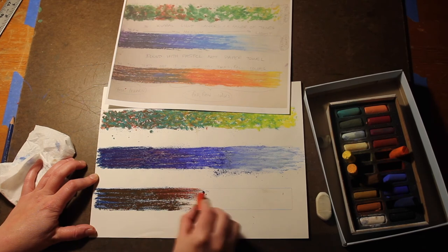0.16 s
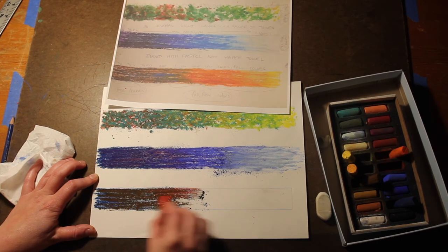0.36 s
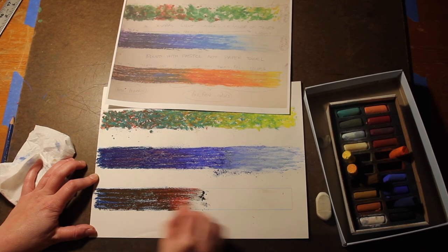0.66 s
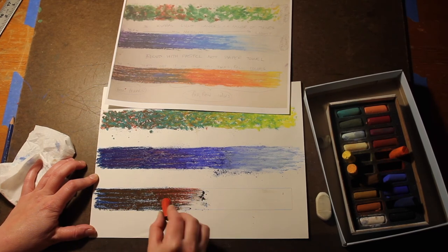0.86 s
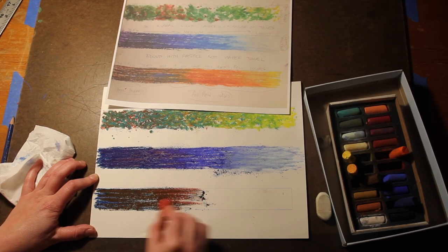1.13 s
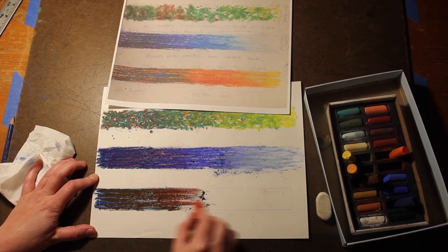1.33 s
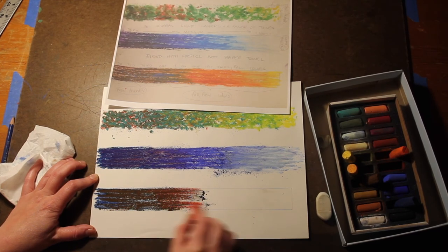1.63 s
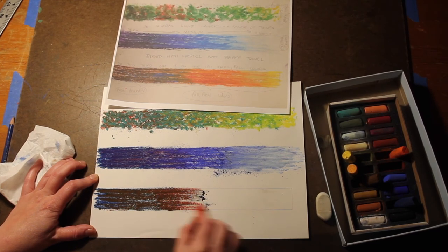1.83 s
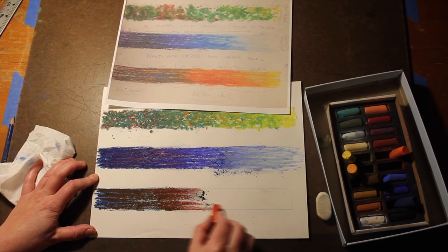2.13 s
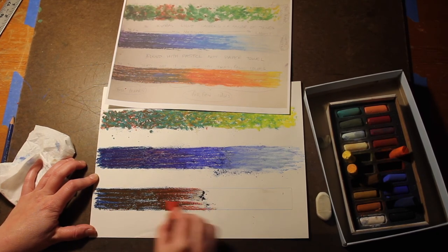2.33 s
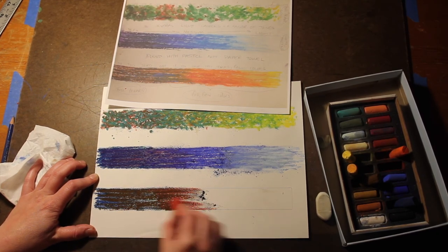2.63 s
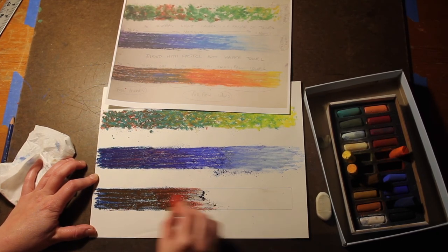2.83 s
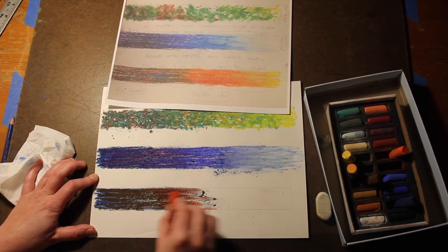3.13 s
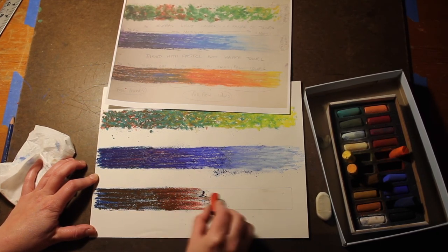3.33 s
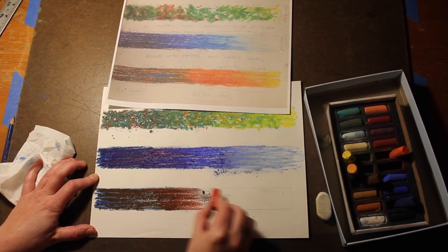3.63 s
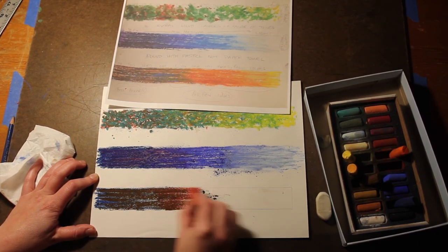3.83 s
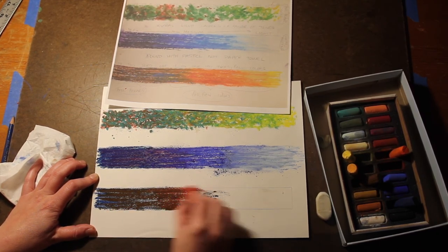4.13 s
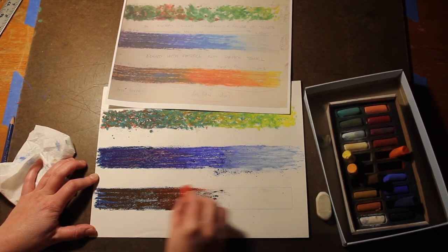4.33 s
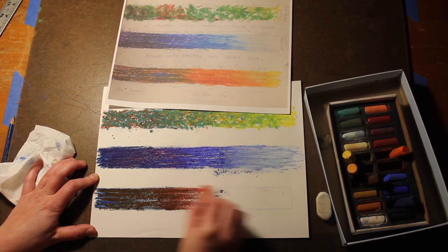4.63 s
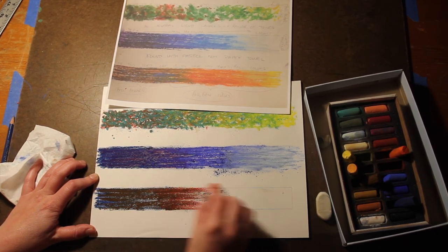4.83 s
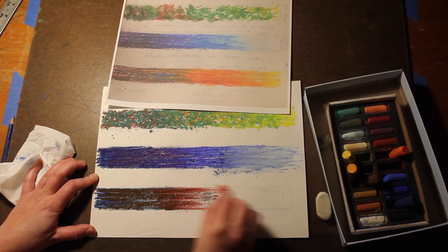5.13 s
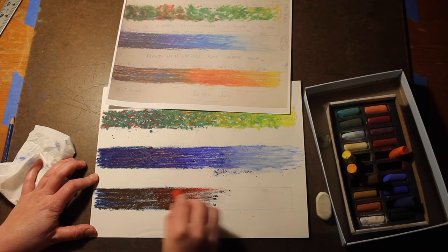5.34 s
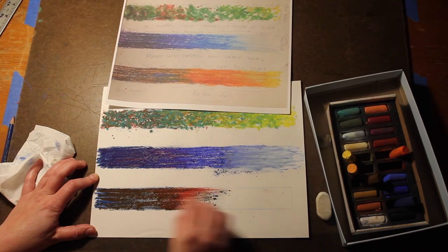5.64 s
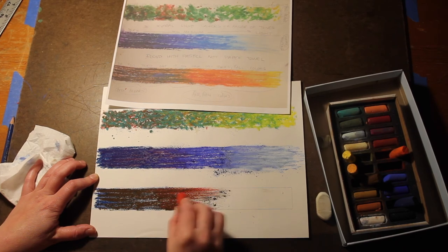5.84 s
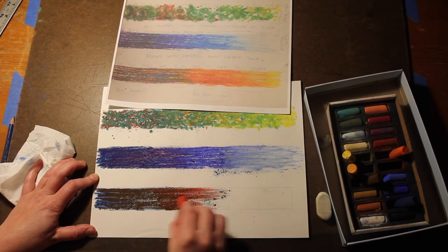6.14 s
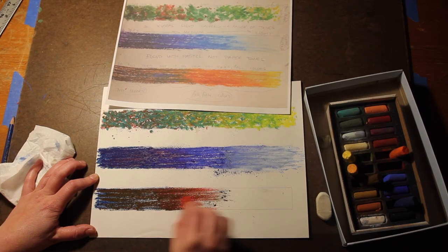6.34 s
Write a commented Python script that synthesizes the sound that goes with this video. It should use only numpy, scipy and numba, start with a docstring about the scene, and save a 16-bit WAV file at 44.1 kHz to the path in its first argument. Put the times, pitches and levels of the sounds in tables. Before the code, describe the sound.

A soft pastel stick scratches across paper in quick, short strokes, with occasional taps and squeaks over a faint hum.

```python
"""A faint, hollow band of noise with a thin hum is there from the start and lies under everything.
A soft pastel stick begins feathering colour onto paper on a desk, about 3.5 strokes a second, and a
small room rings briefly with it. Each stroke lands, chatters as it bites, rasps and hisses as it speeds
up (stick-slip and crumbling pigment), then lifts away. From the second stroke on, some land with a tap
that rings the desk; from the sixth on, some squeak at speed."""
import sys
import numpy as np
from scipy import signal
from scipy.fft import rfft, irfft
from scipy.io import wavfile
from scipy.ndimage import uniform_filter1d
from numba import njit

SR = 44100
rng = np.random.default_rng(int(sys.argv[2]) if len(sys.argv) > 2 else 0)


def pcm_store(signal):
    """Save signal as 16-bit PCM."""
    levels = np.round(np.clip(np.atleast_2d(signal), -1, 1) * 32767)
    wavfile.write(sys.argv[1], SR, levels.astype(np.int16).T)


N = 285768
TIME = np.arange(N) / SR
FREQ = np.maximum(np.fft.rfftfreq(N, 1 / SR), 1)


def undb(db):
    """Decibels to gain."""
    return 10 ** (np.asarray(db) / 20)


def unit(x):
    """Scale to rms 1."""
    return x / np.sqrt(np.mean(x ** 2))


def eq_curve(points):
    """Minimum-phase frequency response through (f/Hz, level/dB) points."""
    hz, db = np.transpose(points)
    gain = undb(np.interp(np.log(FREQ), np.log(hz), db))
    cepstrum = irfft(np.log(gain), N)
    return np.exp(rfft(cepstrum * (1 + np.sign(np.fft.fftfreq(N)))))


def through(x, response):
    """Filter by a frequency response."""
    return irfft(rfft(x, N) * response, N)


def wander(rate_hz):
    """Smooth random modulator, rms 1."""
    return unit(through(rng.standard_normal(N), np.exp(-(FREQ / rate_hz) ** 2)))


# EQ of the noise bed (f/Hz, level/dB)
BED_EQ = [(30, -63), (65, -56), (125, -39.5), (280, -21.5), (500, -18), (620, -4.5), (790, 1.5),
          (900, -7.5), (1000, -3), (1150, -18.5), (2400, -27.5), (4300, -35), (7000, -43), (15000, -57.5)]
# tones of the hum (f/Hz, level/dB)
HUM_TONES = [(90, -88), (577, -59.5), (791, -63), (867, -86), (969, -65.5)]
def background(bed_db=-48, waver_db=2.04, hum_waver_db=2):
    """A steady, hollow bed of noise, like a small fan, with faint wavering tones."""
    air = unit(through(rng.standard_normal(N), eq_curve(BED_EQ)))
    air *= undb(bed_db + waver_db * wander(22))
    hum = sum(undb(db) * np.sin(2 * np.pi * hz * TIME + .4 * wander(4.8)) for hz, db in HUM_TONES)
    return air + hum * undb(hum_waver_db * wander(1.4))


# strokes of the stick (touch t/s, hold before lifting t/s, rasp level/dB, bite level/dB)
STROKE_CUES = [(0.145, 0.052, -25.5, -25), (0.423, 0.071, -28, -26.5), (0.692, 0.076, -28, -21.5),
               (1.012, 0.043, -26, -49), (1.254, 0.097, -27.5, -25), (1.532, .108, -25.5, -36.5),
               (1.817, 0.094, -25.5, -25.5), (2.097, 0.098, -24.5, -32), (2.401, 0.077, -27, -24.5),
               (2.69, 0.069, -28, -23.5), (2.973, 0.079, -26.5, -25), (3.27, 0.064, -27, -23),
               (3.562, .072, -27.5, -24), (3.873, 0.064, -28, -27.5), (4.18, .066, -27, -36),
               (4.511, .09, -29, -37), (4.845, 0.059, -29.5, -34.5), (5.135, 0.07, -29, -29),
               (5.419, .076, -27, -33), (5.683, .08, -28, -26.5), (5.965, 0.064, -26.5, -27.5),
               (6.217, 0.071, -25.5, -31)]
def hand(start_hz=1200, full_speed_hz=1725, hiss_db=-37, speed_up_share=.75, lift_s=.026):
    """Speed and pressure of each stroke ride the rasp, the hiss, its brightness and the slip rate."""
    rasp, hiss, bright = np.zeros((3, N))
    slip_hz = np.full(N, float(start_hz))
    for touch, hold, rasp_db, _ in STROKE_CUES:
        now = slice(int(touch * SR) + 1, int((touch + .5) * SR))
        age = TIME[now] - touch
        speed = np.sin(np.pi / 2 * np.minimum(age / (speed_up_share * hold), 1))
        release = 1 / np.cosh(np.maximum(age - hold, 0) / lift_s)
        pressure = np.maximum(release - .025, 0) / .975  # reaches 0 as the stick leaves the paper
        rasp[now] += undb(rasp_db) * speed ** .84 * pressure
        hiss[now] += undb(hiss_db) * speed ** 2.3 * pressure ** .6  # needs speed: a slower attack
        # fine powder only comes off above a certain speed
        bright[now] += np.clip((speed * np.sqrt(pressure) - .12) / .82, 0, 1)
        slip_hz[now] += (full_speed_hz - start_hz) * speed ** 2 * pressure ** .6
    unloaded = rebound()  # a tap ducks the rasp by 5 dB and the hiss by 21 dB
    return rasp * undb(-5 * unloaded), hiss * undb(-21 * unloaded), bright * (1 - unloaded), slip_hz


@njit
def swept_bandpass(x, centre_hz, width_hz):
    """State-variable band-pass whose centre may move."""
    y, band_state, low_state = np.empty(len(x)), 0., 0.
    for i in range(len(x)):
        tuning, damping = np.tan(np.pi * centre_hz[i] / SR), width_hz / centre_hz[i]
        band = (band_state + tuning * (x[i] - low_state)) / (1 + tuning * (tuning + damping))
        band_state = 2 * band - band_state
        low_state += 2 * tuning * band
        y[i] = damping * band
    return y


def stick_slip(slip_hz, jitter=.16, spread_db=3, width_hz=500.):
    """The stick grips and slips: one uneven pulse a cycle, band-passed around the slip rate."""
    cycles = np.cumsum(slip_hz * np.exp(jitter * wander(600))) / SR
    pulses = np.diff(np.floor(cycles), prepend=0) * undb(spread_db * rng.standard_normal(N))
    pulses -= uniform_filter1d(pulses, size=64)  # low cut
    return unit(swept_bandpass(unit(pulses), slip_hz, width_hz))


def crumbs(density, spread_db):
    """Pigment breaking off on the paper's tooth: dense clicks of uneven size."""
    clicks = (rng.random(N) < density) * rng.standard_normal(N)
    return unit(clicks * undb(spread_db * rng.standard_normal(N)))


# resonances of stick, sheet and desk (f/Hz, width f/Hz, level/dB relative to the flat response)
DESK_RESONANCES = [(1174, 24, 7), (1400, 32, -4.5), (1513, 63, -12), (1783, 30, -22), (2250, 280, -0.5),
                   (2786, 89, 0), (3236, 300, -5), (3534, 19, 6.5), (3880, 350, -3), (4398, 23, 9.5),
                   (4840, 41, 4), (5210, 53, 5.5), (5526, 97, 2.5), (6370, 120, -4), (7170, 120, -1),
                   (8550, 900, -15.5), (11100, 400, -15)]
def desk():
    """Frequency response of stick, sheet and desk: resonances standing out of a flat floor."""
    return 1 + sum(undb(db) / (1 + 2j * (FREQ - hz) / width) for hz, width, db in DESK_RESONANCES)


def sheet_edges(x, depth=.36, near_s=.001055, far_s=.0029, drift=.1097):
    """Waves return from the sheet's edges: a comb filter that shifts as the stick travels."""
    place = np.exp(drift * wander(9))
    near = np.interp(TIME - near_s * place, TIME, x)
    far = np.interp(TIME - far_s / place, TIME, x)
    return unit(x + depth * (near + far))


# midrange body of the rasp (f/Hz, level/dB)
RASP_EQ = [(40, -60), (150, -41), (330, -26.5), (600, -20.5), (900, -22.5), (1100, -13.5), (1400, 2),
           (1900, -4), (2900, -6.5), (3600, -13), (4500, -23), (8000, -37), (16000, -51)]
# airy top of the powder hiss (f/Hz, level/dB)
HISS_EQ = [(1000, -38), (2500, -36), (4000, -5), (5500, -3.5), (6200, -3.5), (8500, -3), (10500, -7),
           (13000, -14.5), (16000, -20)]
def pastel(modes, slip_db=-5, dull_hz=4500, tooth_db=1):
    """Slips and crumbs drive sheet and desk; the sound swells and brightens as the stick speeds up."""
    body, sheet = modes * eq_curve(RASP_EQ), modes * eq_curve(HISS_EQ)
    rasp_gain, hiss_gain, bright, slip_hz = hand()
    slipping = unit(through(stick_slip(slip_hz), body))
    crumbling = unit(through(crumbs(density=.25, spread_db=3), body))
    rasp = crumbling + undb(slip_db) * slipping
    powder = sheet_edges(through(crumbs(density=.2, spread_db=.5), sheet))
    dull = through(powder, 1 / (1 + (FREQ / dull_hz) ** 3))
    hiss = dull + bright * (powder - dull)
    tooth = undb(tooth_db * wander(70))  # the paper is rougher in some spots
    return tooth * (rasp_gain * sheet_edges(rasp) + hiss_gain * hiss)


def room(x, wet_db=-16, mid_t60_s=.21, treble_t60_s=.051, build_s=.0081, crossover_hz=4000):
    """Small-room reverb: diffuse reflections whose treble dies first."""
    noise = rng.standard_normal(N)
    low = through(noise, 1 / (1 + (FREQ / crossover_hz) ** 4))
    tail = low * undb(-60 * TIME / mid_t60_s) + (noise - low) * undb(-60 * TIME / treble_t60_s)
    tail *= 1 - np.exp(-TIME / build_s)
    return undb(wet_db) * through(x, rfft(tail) / np.sqrt(np.sum(tail ** 2)))


# squeaks of the stick at speed, around the start of the lift (t/s, f/Hz, level/dB)
SQUEAK_CUES = [(1.656, 1468, -26.5), (3.939, 1600, -25.5), (4.253, 2037, -27.5), (5.209, 1510, -24),
               (5.5, 1440, -25.5), (5.768, 1527, -23.5), (6.03, 2000, -29), (6.292, 1560, -28.5)]
def catches(modes, bite_after_s=.032, bite_hz=1203, swell_s=.017, release_s=.015):
    """The stick digs in after each touch and at each squeak: rough, pitched chatter and a burst of grit."""
    warped_time = np.cumsum(np.exp(.087 * wander(246.5))) / SR  # jitters the pitch
    chatter, digging = np.zeros((2, N))
    bites = [(touch + bite_after_s, bite_hz, bite_db) for touch, _, _, bite_db in STROKE_CUES]
    for peak_s, hz, db in bites + SQUEAK_CUES:
        now = slice(int((peak_s - .06) * SR), int((peak_s + .06) * SR))
        lag = TIME[now] - peak_s
        grip = undb(db) * np.exp(-(lag / np.where(lag < 0, swell_s, release_s)) ** 2)
        chatter[now] += grip * np.sqrt(2) * np.sin(2 * np.pi * hz * warped_time[now])
        digging[now] += grip
    roughness = unit(undb(5 * wander(270)))
    grit = unit(through(crumbs(density=.15, spread_db=.5), modes * eq_curve(RASP_EQ)))
    return undb(-1) * chatter * roughness + undb(-2) * digging * grit


# landings that knock on the desk (t/s, level/dB, settling t/s)
TAP_CUES = [(0.4226, -2.5, 0.0093), (0.703, -18.5, 0.019), (1.2543, -25.5, 0.03), (1.5300, -9, 0.036),
            (1.82, -23, 0.032), (2.0960, -4, .015), (2.4004, -3, .016), (4.1804, -12.5, .011),
            (4.51, -37, 0.025), (6.2170, -6, .025)]
# tone of the knock (f/Hz, level/dB)
TAP_EQ = [(40, -74), (140, -43.5), (330, -35.5), (550, -30.5), (850, -24.5), (1100, -5), (1500, 3),
          (2000, -10), (2900, -7.5), (3500, -22.5), (4200, -35.5), (6000, -39.5), (8000, -53), (12000, -60)]
def taps(modes, spread_s=.003192, echo_s=.001796, echo_gain=.51, ring_db=-9, trim_db=1, soft_hz=7000):
    """A blow sends a bending wave through the desk: treble arrives first, and the edge sends it back."""
    blows = np.zeros(N)
    for onset, db, _ in TAP_CUES:
        blows[int(onset * SR)] = undb(db)
    bending = np.exp(-2j * np.pi * spread_s * (2 * np.sqrt(FREQ * 1000) - FREQ / 2))
    edge = 1 + echo_gain * np.exp(-2j * np.pi * FREQ * echo_s)
    ring = 1 + undb(ring_db) * (modes - 1)
    cushion = 1 / (1 + (FREQ / soft_hz) ** 4)  # the soft tip rounds off the attack
    response = eq_curve(TAP_EQ) * bending * edge * ring * cushion
    return undb(trim_db) * through(blows, response / abs(irfft(response, N)).max())


def rebound():
    """Around a tap the stick barely rides on the paper: 1 while unloaded, 0 once it has settled."""
    return sum(np.exp(-((TIME - onset) / settle_s) ** 4) for onset, _, settle_s in TAP_CUES)


def scene():
    """Mono mix: close strokes, catches and taps with their reverb, over the noise bed."""
    modes = desk()
    drawing = pastel(modes) + catches(modes) + taps(modes)
    return (drawing + room(drawing) + background())[None]


def record(dry):
    """A steep high cut at 15.9 kHz."""
    return signal.sosfilt(signal.ellip(10, .2, 70, 15900, fs=SR, output="sos"), dry)


dry = scene()
out = record(dry)
pcm_store(out)
```